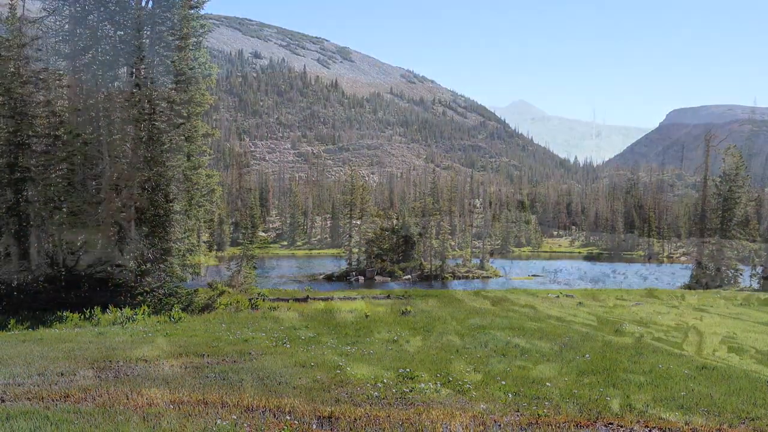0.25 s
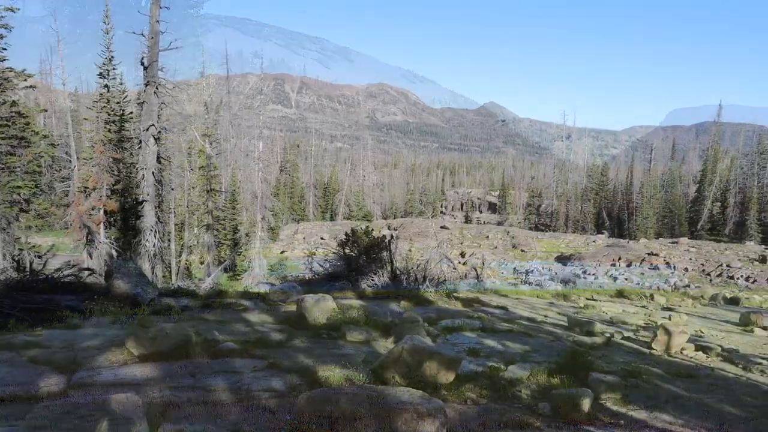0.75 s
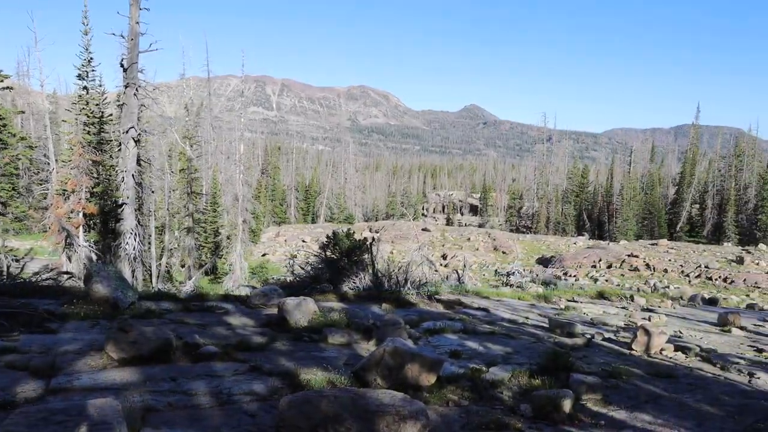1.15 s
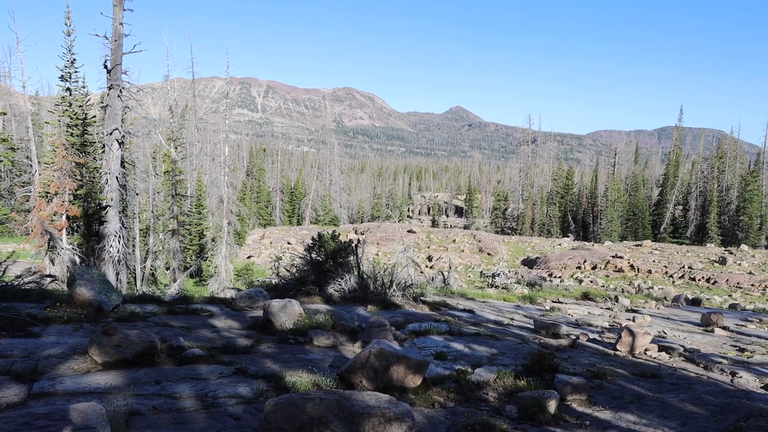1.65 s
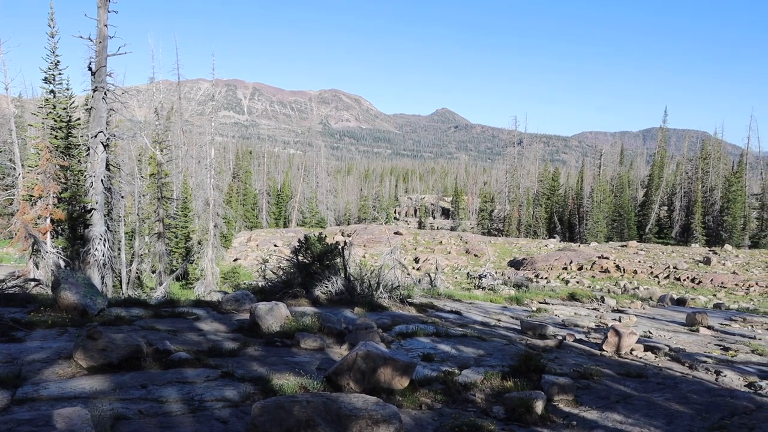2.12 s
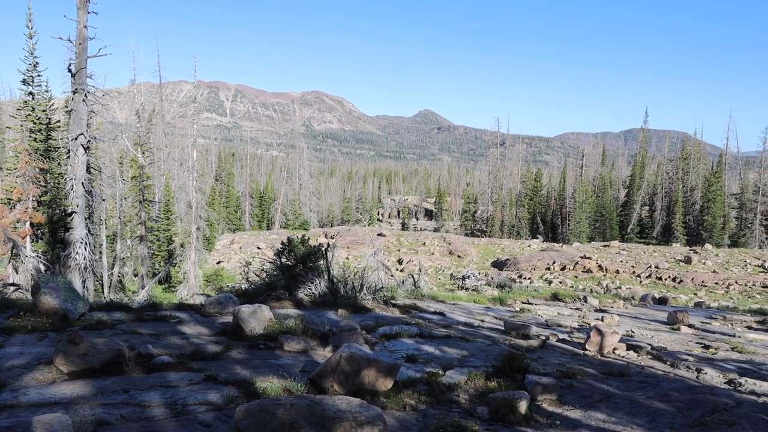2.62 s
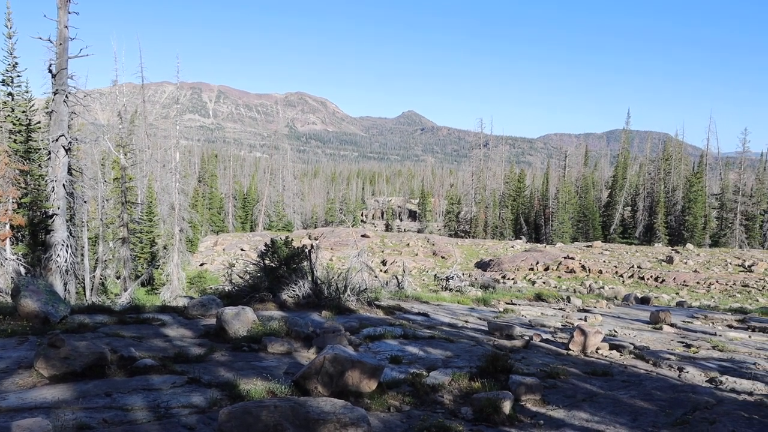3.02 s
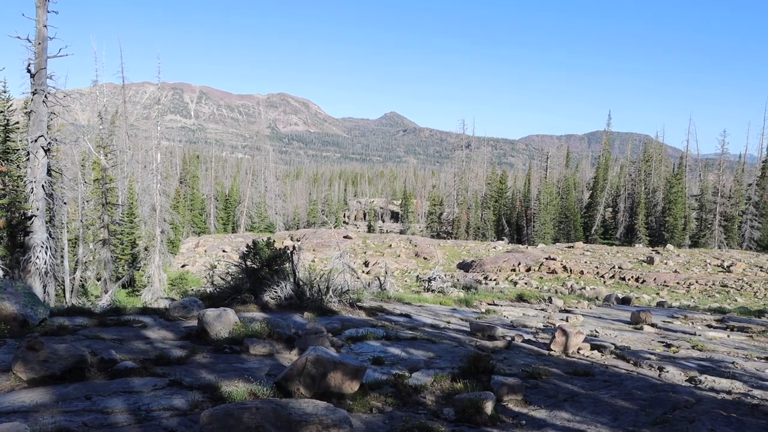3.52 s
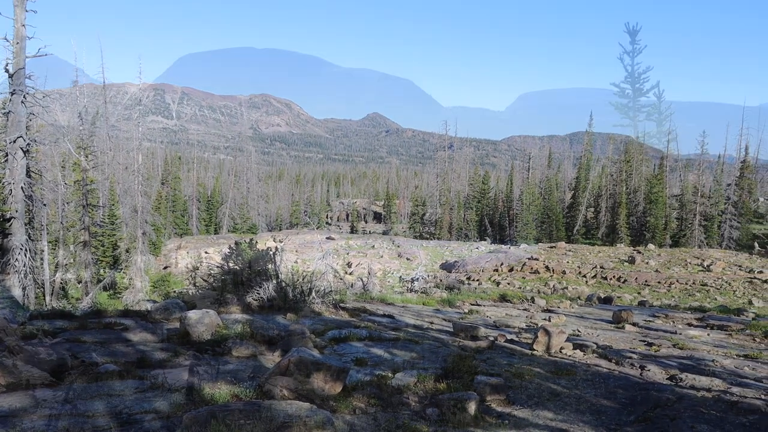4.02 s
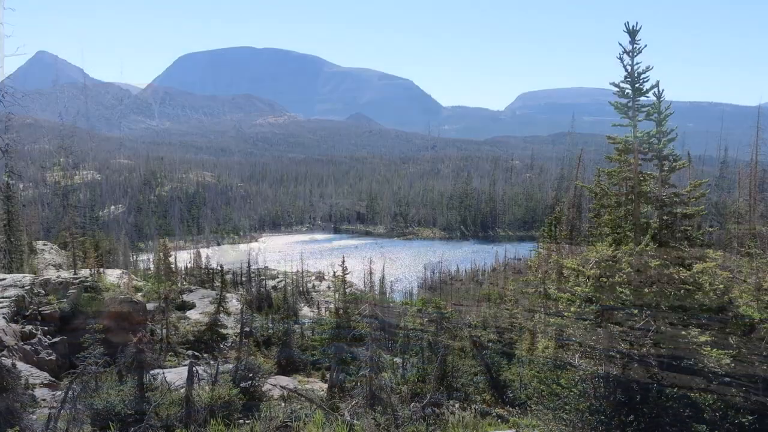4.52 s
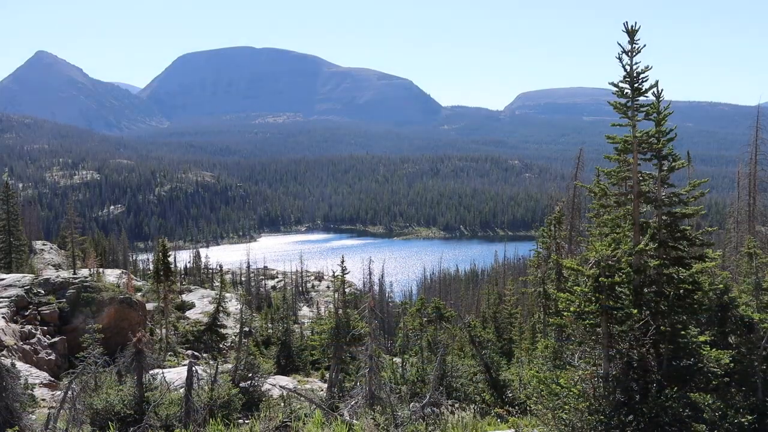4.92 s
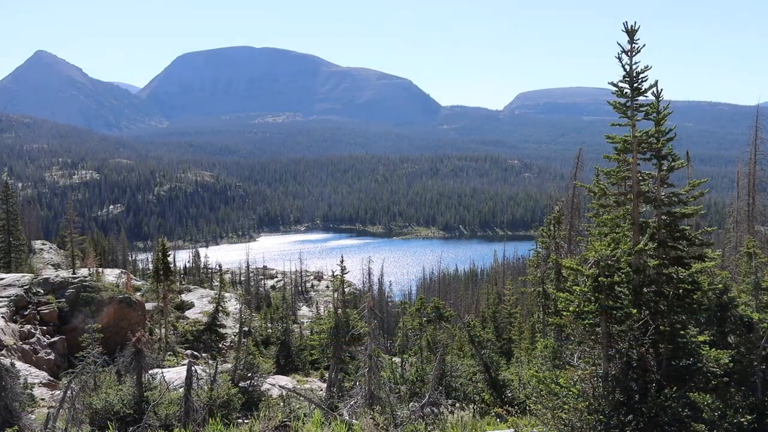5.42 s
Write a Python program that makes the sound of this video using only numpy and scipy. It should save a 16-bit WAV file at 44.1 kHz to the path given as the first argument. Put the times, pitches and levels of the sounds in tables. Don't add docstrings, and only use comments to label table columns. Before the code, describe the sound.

Quiet open mountain forest with a low valley roar, faint distant stream and soft microphone hiss. After about a second of air and light wind, a small bird starts faintly, then trills quickly and evenly, each syllable a falling then a rising high whistle, with short echoes off rock and trunks. It swells and stops before four seconds. Sparse far birds chip; wind puffs and small handling ticks touch the microphone.

```python
import sys
import numpy as np
from scipy import signal
from scipy.fft import rfft, irfft
from scipy.io import wavfile
from scipy.ndimage import uniform_filter1d, map_coordinates

SR = 44100
rng = np.random.default_rng(int(sys.argv[2]) if len(sys.argv) > 2 else 0)


def persist_wave(psi):
    counts = np.round(np.clip(psi, -1, 1) * 32767).astype(np.int16)
    wavfile.write(sys.argv[1], SR, np.atleast_2d(counts).T)


def decibels_to_gain(level_db):
    exponent = np.asarray(level_db, float) / 20
    return 10 ** exponent


N = 249560


def unit(x):
    return x / np.sqrt(np.mean(x ** 2) + 1e-20)


def wobble(rate):
    knots = rng.standard_normal(int(N * rate / SR) + 4)
    return map_coordinates(knots, [np.arange(N) * rate / SR])


def rush(spectrum, side_db, patchy_db):
    z = signal.stft(rng.standard_normal((2, N)), nperseg=512)[2]
    field = uniform_filter1d(rng.standard_normal(z.shape[1:]), size=5, axis=0)
    field = uniform_filter1d(field, size=4, axis=1)
    pair = signal.istft(z * decibels_to_gain(patchy_db * unit(field)), nperseg=512)[1][:, :N]
    f, db = np.transpose(spectrum)
    gain = decibels_to_gain(np.interp(np.log(np.fft.rfftfreq(N, 1 / SR) + 1), np.log(f), db))
    mid, side = irfft(rfft(pair) * gain, N)
    side = decibels_to_gain(side_db) * side
    return np.array([mid + side, mid - side]) / mid.std()


# far roar level/dB, stream level/dB, hiss level/dB
PLACES = [
    (-63, -64, -67),
    (-63, -60.5, -69),
    (-63.5, -64.5, -68),
]
# from t/s, to t/s
DISSOLVES = [
    (.02, 0.95),
    (3.92, 4.79),
]


def places():
    t = np.arange(N) / SR
    second, third = (np.clip((t - a) / (b - a), 0, 1) for a, b in DISSOLVES)
    shares = np.array([1 - second, second - third, third])
    return np.sqrt(decibels_to_gain(PLACES).T ** 2 @ shares ** 2)


# f/Hz, level/dB per Hz
ROAR = [(60, -45), (110, -10.5), (220, -3), (400, -6.5), (700, -9), (1200, -27)]
# f/Hz, level/dB per Hz
STREAM = [(250, -37), (500, -7.5), (900, 0.5), (1400, -0.5), (2000, -5), (3000, -10.5), (5000, -15),
          (9000, -21.5)]
# f/Hz, level/dB per Hz
HISS = [(20, 18.5), (300, 9.5), (1500, -1), (4000, 1.5), (8000, 0.5), (15500, -2)]


def air():
    roar, stream, hiss = places()
    roar = roar * decibels_to_gain(1.32 + 0.35 * wobble(3.16)) * rush(ROAR, side_db=-23.5, patchy_db=0.0)
    stream = stream * decibels_to_gain(0.8 + 0.3 * wobble(9)) * rush(STREAM, side_db=-43, patchy_db=0.5)
    channel_db = 5.5 + np.array([[.25], [-.25]])
    hiss = hiss * decibels_to_gain(channel_db) * rush(HISS, side_db=-7.5, patchy_db=1.0)
    return roar + stream + hiss


# f/Hz, level/dB per Hz
BUFFET = [(12, -13.5), (25, 4.5), (50, -4), (80, -8), (130, -15.5), (200, -46), (400, -75)]
# middle t/s, peak level/dB, half width t/s
PUFFS = [(.03, -50, 0.076), (.2, -56.5, 0.078), (.36, -52, 0.11), (.84, -50, 0.03), (2.11, -56, .025),
         (2.32, -64, .05), (3.33, -66, 0.034), (3.53, -59.5, 0.022), (3.66, -68, 0.046), (4.02, -62, 0.033),
         (4.46, -52, 0.017), (4.55, -48.5, .05), (4.67, -52, 0.069), (4.8, -43.5, 0.06), (4.92, -56, 0.061),
         (5.08, -51, 0.069), (5.29, -63, .04), (5.44, -68, .03), (5.58, -59, 0.022), (5.66, -56, 0.03)]
BREEZE_DB = -67.5


def wind():
    t = np.arange(N) / SR
    push = decibels_to_gain(BREEZE_DB + 1.9 * wobble(6.2))
    for s, db, half in PUFFS:
        push = push + decibels_to_gain(db) * np.exp(-((t - s) / half) ** 2)
    lumps = unit(decibels_to_gain(1.1 * wobble(14)) * rush(BUFFET, side_db=-31.0, patchy_db=-1.2))
    return decibels_to_gain(-3.5) * push * lumps


def add(track, s, hz, db, glide_ms):
    n = np.arange(int(s[0] * SR), min(int(s[-1] * SR), N))
    size = int(glide_ms * SR / 1000)
    pitch, level = (uniform_filter1d(np.interp(n / SR, s, v), size=size) for v in (hz, db))
    cycles = np.cumsum(pitch) / SR + rng.random()
    track[n] += decibels_to_gain(level) * np.sin(2 * np.pi * cycles)


# start t/s, length t/s, first f/Hz, last f/Hz, level/dB
CHIPS = [(0.098, 0.034, 3100, 2720, -63), (1.318, 0.022, 5000, 5040, -62.5), (1.334, .034, 3950, 4220, -64),
         (1.36, 0.036, 4200, 3620, -62), (1.387, .04, 5600, 4440, -62), (1.418, 0.052, 4680, 3600, -63),
         (3.33, .053, 3470, 3440, -63.5), (3.617, 0.037, 2064, 2080, -58), (4.05, 0.028, 2500, 2650, -65),
         (4.116, .03, 2480, 2500, -63), (4.24, 0.093, 2560, 2670, -66), (5.266, .014, 2400, 3200, -55),
         (5.277, .008, 3600, 4600, -53), (5.266, 0.0087, 3860, 4500, -58.5), (5.298, .016, 2200, 2260, -61),
         (5.314, 0.011, 2310, 2370, -53), (5.335, .012, 2950, 1700, -55), (4.002, .016, 1880, 2290, -60),
         (4.106, .014, 1900, 2450, -57)]
# t/s, f/Hz, level/dB
ARCH = [(5.264, 1510, -72), (5.277, 1903, -62), (5.285, 2780, -46), (5.292, 3160, -53), (5.3, 3390, -48),
        (5.314, 3417, -54), (5.327, 3500, -58), (5.332, 2340, -42.5), (5.339, 1300, -64)]
CHIP_EDGE, CHIP_EDGE_DB = 0.22, -13


def chips():
    calls = np.zeros(N)
    share = np.array([0, CHIP_EDGE, 1 - CHIP_EDGE, 1])
    edge_db = CHIP_EDGE_DB * np.array([1, 0, 0, 1])
    for s, length, first, last, db in CHIPS:
        add(calls, s + length * share, first + (last - first) * share, db + edge_db, glide_ms=1.7)
    add(calls, *np.transpose(ARCH), glide_ms=2.5)
    return calls


# t/s, peak level/dB, f/Hz, decay by 60 dB t/s
BUMPS = [(.822, -54, 45, .12), (.826, -56, 131, 0.049), (1.956, -43.5, 780, 0.019),
         (1.957, -43.5, 235, 0.043), (2.091, -53.5, 118, 0.057), (2.097, -48.5, 206, 0.1),
         (2.1, -48, 34.8, 0.21), (2.614, -33.5, 910, 0.0064), (4.411, -47, 7600, .002),
         (4.436, -43, 7000, .001), (4.483, -52, 1700, .003), (5.646, -53, 60, .1), (5.648, -46, 600, 0.022)]


def bumps():
    out = np.zeros(N + SR)
    t = np.arange(SR // 2) / SR
    for s, db, hz, t60 in BUMPS:
        onset = 1 - np.exp(-t * hz * 6)
        out[round(s * SR):][:len(t)] += decibels_to_gain(db - 60 * t / t60) * np.sin(2 * np.pi * hz * t) * onset
    return out[:N]


def whistles(song, starts, efforts, shape, hz, slope, reach, top):
    scatter_s, scatter_db, scatter_hz = .0003, .7, 35
    full_db = -39
    ms, height, db = np.transpose(shape)
    chance = rng.standard_normal((len(starts), 4)) * [scatter_s, scatter_db, scatter_hz, scatter_hz]
    for s, level, (ds, ddb, *dhz) in zip(starts, efforts, chance):
        soft = max(full_db - level, 0)
        low, high = np.add(hz, dhz) + np.array([soft, np.sqrt(soft)]) * slope
        uneven_db = rng.normal(0, 0.87, len(db))
        tip_db = (ms > -8) * np.clip(height - top, 0, .45) * np.clip(reach * soft, 0, 16)
        drawn_ms = ms[2] + (ms - ms[2]) * (high - low) / (hz[1] - hz[0])
        note_db = level + ddb - 2.2 + db + uneven_db + tip_db
        add(song, s + ds + drawn_ms / 1000, low + (high - low) * height, note_db, glide_ms=0.96)


# t/ms from its middle, height from low pitch 0 to high pitch 1, level/dB
FALL = [(-14.5, 1.05, -43), (-13.5, 1.055, -21), (-6.5, 1.02, -7.5), (-4.5, 0.43, -6.5), (-1.5, 0.16, 0),
        (2, 0.021, -3.5), (5, -.02, -35), (7.5, 0.36, -18), (8, 0.48, -50)]
# t/ms from its middle, height from low pitch 0 to high pitch 1, level/dB
RISE = [(-14.5, -0.26, -45), (-9.5, -0.17, -19), (-5.5, 0.092, -3), (-4, 0.32, -2), (-3, 0.58, -2),
        (-0.5, 1.03, -8.5), (1.4, 0.96, -16), (4, 1.6, -29), (6, 1.75, -52)]
COUNTED = [0, 7, 11, 16, 20, 25, 30, 37, 40]
# t/s, fall level/dB, rise level/dB
SONG = [
    (1.3981, -69.5, -56.5),
    (1.7888, -41, -40.5),
    (2.0056, -38, -38.5),
    (2.2843, -37.5, -38.5),
    (2.5133, -38, -36.5),
    (2.795, -37.5, -36),
    (3.08, -37, -34.5),
    (3.472, -37, -34),
    (3.6484, -39, -38.5),
]
RISE_AFTER_S = .0223
SWAY_DB, SWAY_PERIOD_S, SWAY_DIP_S, SWAY_LASTS_S = 2, 0.33, 2.39, 0.31


def trill():
    song = np.zeros(N)
    s, *dbs = np.transpose(SONG)
    number = np.arange(COUNTED[-1] + 1)
    beats = np.interp(number, COUNTED, s)
    fall_db, rise_db = [40 * np.log10(np.interp(number, COUNTED, decibels_to_gain(db / 2))) for db in dbs]
    away = beats - SWAY_DIP_S
    sway_db = -SWAY_DB * np.cos(2 * np.pi * away / SWAY_PERIOD_S) * np.exp(-(away / SWAY_LASTS_S) ** 2)
    whistles(song, beats, fall_db + .3 * sway_db, FALL,
             hz=(3995, 5060), slope=(9, 1.5), reach=.6, top=.25)
    whistles(song, beats + RISE_AFTER_S, rise_db + sway_db, RISE,
             hz=(5658, 6454), slope=(29.5, 181), reach=2.2, top=.7)
    return song


# f/Hz, level/dB
TRUNKS = [(1000, 1), (4000, -9), (4400, 1.5), (5000, 7), (5600, 6.5), (6400, -1), (9000, -5)]


def forest(x, paths, wet_db, t60, side_db):
    t = np.arange(SR // 2) / SR
    colour = decibels_to_gain(np.interp(np.fft.rfftfreq(len(t), 1 / SR), *np.transpose(TRUNKS)))
    tail = irfft(rfft(rng.standard_normal((2, len(t)))) * colour) * decibels_to_gain(-60 * t / t60)
    build_up = 1 - np.exp(-(t / 0.013) ** 2)
    mid, side = decibels_to_gain(wet_db) * tail / np.sqrt(np.sum(decibels_to_gain(-120 * t / t60))) * build_up
    lead = 16
    for ms, db in paths:
        mid += decibels_to_gain(db) * np.sinc(np.arange(len(t)) - lead - ms * SR / 1000)
    side = decibels_to_gain(side_db) * side
    response = np.array([mid + side, mid - side])
    return signal.fftconvolve(x[None], response, axes=1)[:, lead:N + lead]


# t/ms, level/dB
PATHS = [(.163, 0), (1.277, -8), (4.567, 0), (5.216, 0), (5.837, -9), (9.2, -15), (12.81, -17),
         (15.171, -17), (17.3, -14), (23.6, -19), (30.5, -21)]


def scene():
    bird = forest(trill(), PATHS, wet_db=-5.0, t60=0.41, side_db=-46)
    far_paths = [(0, -2.5), (4.6, -14), (9, -19)]  # t/ms, level/dB
    far = forest(chips(), far_paths, wet_db=-8.5, t60=0.31, side_db=-22)
    return bird + far + bumps() + air() + wind()


def low_pass(x):
    return signal.sosfilt(signal.butter(12, 16660, fs=SR, output="sos"), x)


def record(dry):
    top_hz = 15780
    kept = irfft(rfft(dry) * (np.fft.rfftfreq(N, 1 / SR) < top_hz), N)
    return low_pass(kept)


dry = scene()
out = record(dry)
persist_wave(out)
```